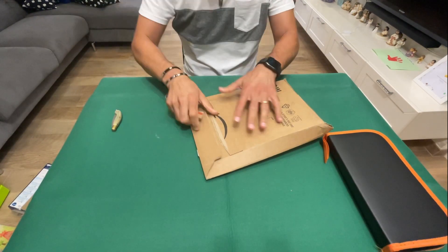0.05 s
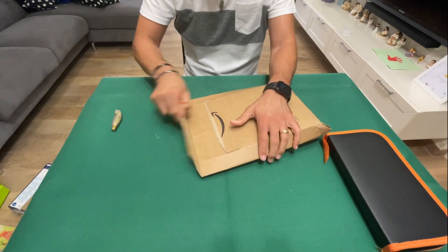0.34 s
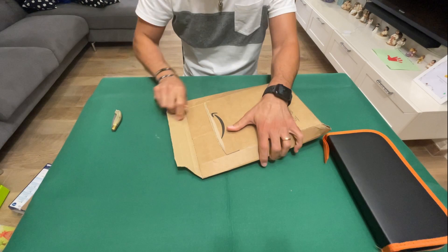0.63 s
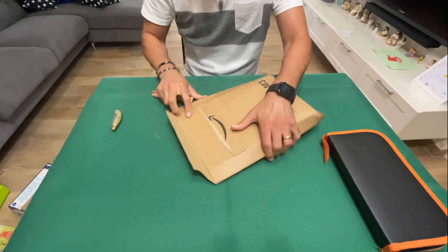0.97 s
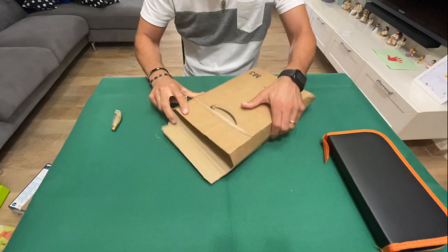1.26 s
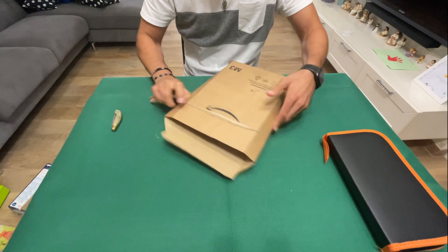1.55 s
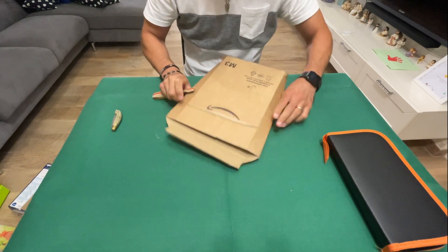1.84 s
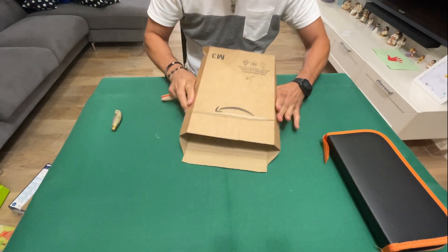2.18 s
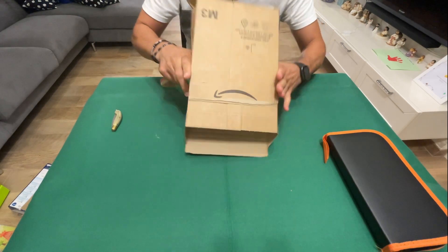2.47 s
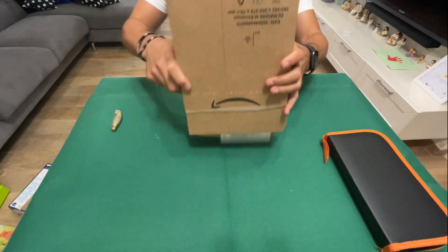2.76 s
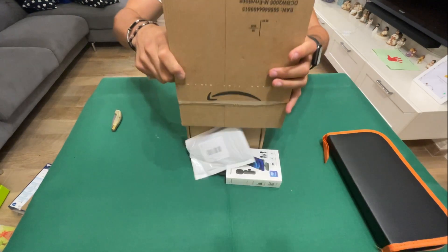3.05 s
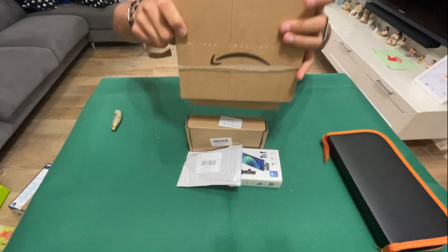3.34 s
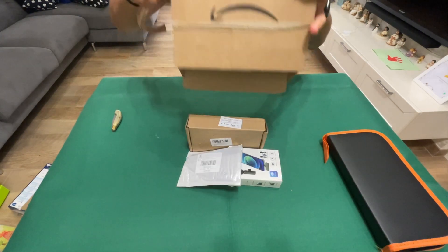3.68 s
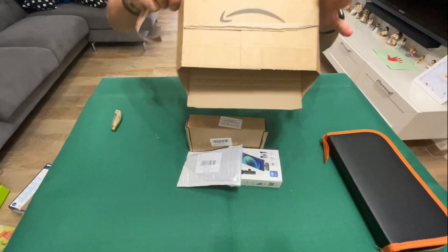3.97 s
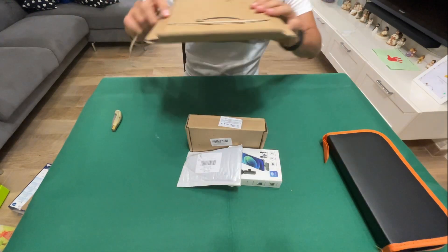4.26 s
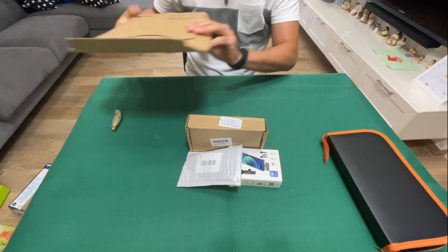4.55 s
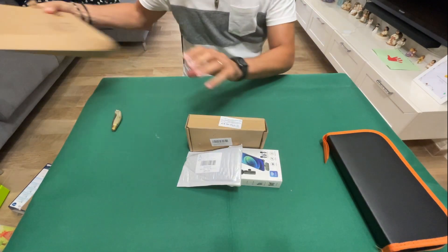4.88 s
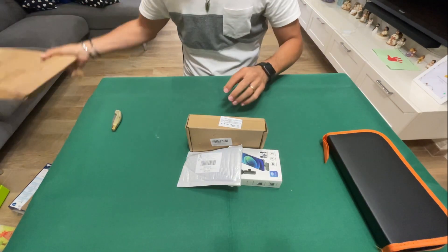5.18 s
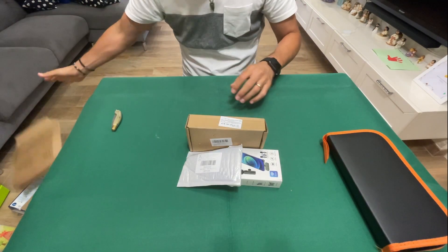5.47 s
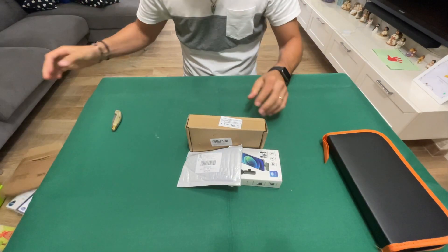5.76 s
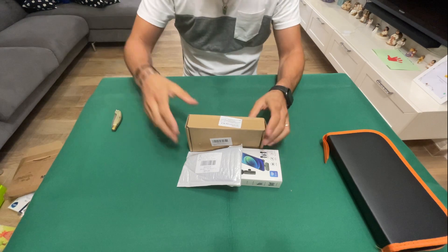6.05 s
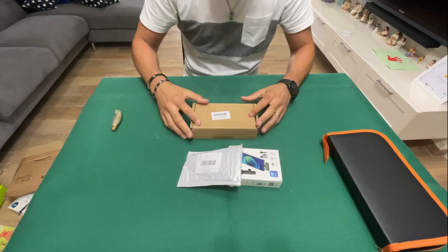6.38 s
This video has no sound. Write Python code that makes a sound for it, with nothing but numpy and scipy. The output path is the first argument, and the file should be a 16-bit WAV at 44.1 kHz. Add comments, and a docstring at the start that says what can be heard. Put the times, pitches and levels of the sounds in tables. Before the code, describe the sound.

After a few faint taps, the glued flap of a cardboard mailer lets go with a sharp, dry snap at about 0.4 seconds. Until 2.7 seconds the card is turned and tipped: uneven rubbing, papery hiss, small crease ticks and light bumps on a cloth-covered table, over a low handling rumble. From 2.8 to 3 seconds small boxes drop out in a quick cluster of hollow knocks and table thumps, the loudest moment, with a smaller knock at 3.3. Softer swishes and rustles of the empty mailer follow until about 4.8. Around 5.6 seconds it lands on the floor slightly to the left with a clap and rocks briefly. Light rubbing leads to one hollow knock at 6.4 as a box is set down. The stereo microphone is close, in a fairly live room with faint background air and hum.

```python
"""A cardboard mailer is opened on a cloth-covered table, near a stereo microphone in a fairly live room.
First its glued flap snaps free and rings. Stick-slip friction rubs and hisses as it is turned and tipped
up. Small boxes slide out and drop, each impact exciting their air, their panels and the table top.
Then the empty mailer is tossed on the floor, where it claps and rocks. Last, a box is set down again."""
import sys
import numpy as np
from scipy import signal
from scipy.fft import rfft, irfft, next_fast_len
from scipy.io import wavfile
from scipy.ndimage import map_coordinates

SR = 44100
rng = np.random.default_rng(int(sys.argv[2]) if len(sys.argv) > 2 else 0)


def master(y):
    """Save y as 16-bit WAV."""
    cut = np.clip(np.atleast_2d(y).T, -1, 1)
    pcm = np.round(cut * 32767)  # scale
    wavfile.write(sys.argv[1], SR, pcm.astype(np.int16))


N = 287669


def amp(db):
    """Decibels as an amplitude ratio."""
    return 10 ** (np.asarray(db) / 20)


def unit(x):
    """Normalisation to rms 1."""
    return x / np.sqrt(np.mean(x ** 2) + 1e-20)


def along(points, hz):
    """Interpolation of (frequency, value) points on a logarithmic frequency axis."""
    f, v = np.transpose(points)
    return np.interp(np.log(hz + 1), np.log(f + 1), v)


def wobble(rate):
    """Smooth random modulation: a spline through `rate` knots a second."""
    knots = rng.standard_normal(int(N * rate / SR) + 4)
    return map_coordinates(knots, [np.arange(N) * rate / SR])


def filtered(x, response):
    """Linear filtering by a complex frequency response."""
    n = x.shape[-1]
    m = next_fast_len(n + 8192)
    return irfft(rfft(x, m) * response(np.fft.rfftfreq(m, 1 / SR)), m)[..., :n]


def coloured(x, spectrum):
    """Spectral shaping by (frequency, level) points; rms 1."""
    return unit(filtered(x, lambda hz: amp(along(spectrum, hz))))


def add(track, s, sound):
    """Superposition of a sound on the track at s seconds."""
    part = track[..., round(s * SR):][..., :sound.shape[-1]]
    part += sound[..., :part.shape[-1]]


def ring(modes, contact_ms, detune, swell_cycles):
    """Damped modal vibration after a blow, peak 1; a longer contact excites the high modes less."""
    t = np.arange(int(.35 * SR)) / SR
    hz, db, t60 = np.transpose(modes)[:, :, None]
    pitch, size = rng.standard_normal((2, len(modes), 1))  # they depend on where the blow lands
    softness = 1 / (1 + (hz * contact_ms / 1000) ** 2)
    swell = 1 - np.exp(-(t * hz / swell_cycles) ** 2)  # the card crushes: high modes speak first
    decay = amp(db + 2 * size - 60 * t / t60)
    y = np.sum(softness * swell * decay * np.sin(2 * np.pi * hz * np.exp(detune * pitch) * t), axis=0)
    return y / np.abs(y).max()


def hollow(hz, rise_cycles=0.8, t60_cycles=6.8, lead_cycles=0.22):
    """Air pumping: a struck face drives the air behind it in one "tock" of falling pitch; peak 1."""
    cycles = hz * np.arange(SR // 10) / SR
    envelope = (1 - np.exp(-(cycles / rise_cycles) ** 2)) * amp(-60 * cycles / t60_cycles)
    phase = cycles + lead_cycles * (1 - np.exp(-cycles))
    return envelope / envelope.max() * np.sin(2 * np.pi * phase)


def crack(spectrum, t60):
    """A broadband transient: paper surfaces slap together in a short noise burst."""
    t = np.arange(int(.35 * SR)) / SR
    noise = coloured(rng.standard_normal(len(t)), spectrum)
    return noise * amp(-60 * t / t60) * (1 - np.exp(-t / 0.00099))


def grains(rate, spread_db, smooth):
    """Shot noise: fibres catch and slip in random ticks over smooth friction noise."""
    ticks = (rng.random(N) < rate / SR) * rng.choice([-1, 1], N)
    sizes = amp(spread_db * np.minimum(rng.exponential(size=N), 2))
    return unit(ticks * sizes) + smooth * rng.standard_normal(N)


# likeness of the room sound at left and right: (frequency [Hz], coherence [ratio])
COHERENCE = [(30, 0.86), (100, 0.73), (250, 0.62), (600, 0.36), (1200, 0.069)]
def diffuse(pair):
    """Diffuse-field coherence: two independent signals become left and right, alike in the bass only."""
    angle = lambda hz: np.arccos(np.clip(along(COHERENCE, hz), -1, 1)) / 2
    mid, side = filtered(pair, lambda hz: np.array([np.cos(angle(hz)), np.sin(angle(hz))]))
    return np.array([mid + side, mid - side])


# reverberation time of the living room: (frequency [Hz], T60 [s])
ROOM_T60 = [(100, 0.64), (300, 0.44), (4000, 0.57), (11000, 0.38)]
def room(x):
    """Reverberation: convolution with a diffuse tail in which each frequency decays at its own rate."""
    hz, t, spectra = signal.stft(rng.standard_normal((2, int(.6 * SR))), SR, nperseg=256)
    tail = signal.istft(spectra * amp(-60 * t / along(ROOM_T60, hz)[:, None]), SR, nperseg=256)[1]
    tail = diffuse(tail) * (1 - np.exp(-np.arange(tail.shape[1]) / SR / 0.0036))
    return signal.fftconvolve(x[None], tail / np.linalg.norm(tail[0]), axes=1)


def near(x, lead_ms, early_db):
    """Path differences: direct sound reaches the left port first; table, body and card reflect it."""
    t = np.arange(int(.08 * SR)) / SR
    early = diffuse(rng.standard_normal((2, len(t)))) * amp(-60 * t / 0.079) * (1 - np.exp(-t / 0.0017))
    out = signal.fftconvolve(x[None], amp(early_db) * early / np.linalg.norm(early[0]), axes=1)
    direct = filtered(x, lambda hz: np.exp(1j * np.pi * hz * lead_ms / 1000 * np.array([[1], [-1]])))
    add(out, 0, direct)
    return out


# spectrum of still room air: (frequency [Hz], level [dB])
AIR_SPECTRUM = [(15, -37), (35, 5), (86, 2), (390, -7), (500, -10), (620, -10.5), (1000, -17),
                (1600, -20.5), (9000, -32), (11000, -67), (13000, -67)]
def background():
    """Ambient noise: diffuse room air and a faint narrow-band hum."""
    air = diffuse(coloured(rng.standard_normal((2, N)), AIR_SPECTRUM))
    hum = filtered(rng.standard_normal((2, N)), lambda hz: 1 / (1 + ((hz - 515) / 28) ** 2))
    return amp(-58) * air + amp(-61.5) * unit(hum)


def held(start, end, attack_s=0.013, release_s=0.024):
    """Envelope of a grip: linear attack, hold and exponential release."""
    now = np.arange(N) / SR
    return np.clip((now - start) / attack_s, 0, 1) * np.exp(-np.maximum(now - end, 0) / release_s)


def dying(blows, t60):
    """Exponential decay: the envelope of a rumble fed with energy by each (time, level) blow."""
    power, t = np.zeros(N), np.arange(SR) / SR
    for s, db in blows:
        add(power, s, amp(db - 60 * t / t60) ** 2 * (1 - np.exp(-t / 0.0072)))
    return np.sqrt(power)


# spectrum of the handling rumble: (frequency [Hz], level [dB])
RUMBLE_SPECTRUM = [(15, -40.5), (30, -21.5), (60, -0.5), (113, 4.5), (190, -7.5), (300, -8), (500, -31)]
def rumble(rub, on_table_db=-5.5, lifted_db=-9.5):
    """Structure-borne sound: rubbing couples best through the table; table and floor shudder if hit."""
    lifted = held(3.5, 5.6)  # nothing handled touches the table
    coupling = amp(on_table_db + (lifted_db - on_table_db) * lifted)
    table = amp(-20) * dying([(s, thump_db) for s, *_, thump_db, _ in TABLE_IMPACTS], t60=0.62)
    floor = amp(-32) * dying([row[:2] for row in FLOOR_IMPACTS], t60=1)
    drive = np.sqrt((coupling * rub) ** 2 + table ** 2 + floor ** 2)
    return drive * coloured(rng.standard_normal(N), RUMBLE_SPECTRUM) * amp(1.8 * wobble(21))


# the mailer sliding and flexing: (time [s], half length [s], level [dB], cavity frequency [Hz])
CAVITY_SWISHES = [(1.394, 0.012, -40.5, 460), (2.002, 0.063, -45, 308), (2.51, 0.082, -45, 500),
                  (2.67, 0.017, -31.5, 736), (3.988, 0.026, -41.5, 980), (4.338, 0.0041, -40.5, 960),
                  (4.622, 0.037, -48.5, 1230)]
def swishes(q=3.5):
    """Cavity resonance: friction sounds the open mailer's air and, more weakly, the octave above."""
    out, now = np.zeros(N), np.arange(N) / SR
    peak = lambda hz, centre: 1 / (1 + 1j * q * (hz / centre - centre / (hz + 1)))
    for s, half, db, cavity_hz in CAVITY_SWISHES:
        friction = grains(rate=900, spread_db=4, smooth=0.76)
        voice = filtered(friction, lambda hz: peak(hz, cavity_hz) - amp(-26.5) * peak(hz, 2 * cavity_hz))
        out += amp(db - 5.5) * unit(voice) * np.exp(-((now - s) / half) ** 2 / 2)
    return near(out, lead_ms=0.12, early_db=3.0)[:, :N] + amp(-16) * room(out)[:, :N]


# spectrum of one tick: (frequency over the brightest frequency [ratio], level [dB])
TICK_SPECTRUM = [(0.08, -15), (0.33, 0), (1, 4), (2, -8), (4, -13)]
# creases, tape and catching edges: (time [s], level [dB], brightest frequency [Hz])
CREASE_TICKS = [(0.098, -50, 6000), (1.059, -33.5, 6000), (1.176, -33, 6100), (1.193, -34.5, 3020),
                (1.291, -27.5, 8200), (1.38, -26.5, 6040), (1.391, -26.5, 6000), (1.747, -30, 1990),
                (1.954, -27, 1800), (2.424, -32, 5000), (2.528, -36, 4000), (2.64, -30, 6100),
                (2.768, -27.5, 8000), (3.261, -34, 2000), (4.007, -39.5, 3000)]
def creases():
    """Sudden elastic release: stiff creases tick as they bend, and edges as they catch."""
    out = np.zeros((2, N))
    for s, tick_db, bright_hz in CREASE_TICKS:
        spectrum = [(ratio * bright_hz, db) for ratio, db in TICK_SPECTRUM]
        tick = amp(tick_db + 4) * crack(spectrum, t60=0.011)
        add(out, s, near(tick, lead_ms=0.11, early_db=-2))
    return out + amp(-6.0) * room(out[0])[:, :N]


def stroke_speed(s, length, roundness=1.43):
    """Bell-shaped velocity profile: a hand speeds up and slows down, peak 1 at s."""
    t = np.arange(N) / SR - s
    return np.exp(-np.abs(t / (length / 2)) ** roundness)


# hands and cardboard passing over each other: (peak time [s], length [s], rub [dB], hiss [dB])
HAND_STROKES = [(0.012, 0.095, -56, -49.5), (0.42, 0.1, -44, -51), (0.694, 0.11, -53, -51.5),
                (0.801, 0.068, -47.5, -43), (1.197, 0.07, -42.5, -45.5), (1.398, 0.085, -36, -42.5),
                (1.603, 0.089, -35.5, -47), (1.75, 0.031, -47, -74), (1.97, 0.3, -46, -50.5),
                (2.348, 0.11, -44.5, -58), (2.433, 0.055, -43, -42), (2.54, 0.13, -42, -46.5),
                (2.682, 0.085, -34.5, -41), (3.108, 0.28, -48, -48), (3.264, 0.088, -50.5, -45.5),
                (3.724, 0.079, -56.5, -69), (3.967, 0.15, -47, -51.5), (4.082, 0.2, -54, -54),
                (4.293, 0.084, -49, -58), (4.478, 0.027, -56.5, -56.5), (4.615, 0.14, -47, -53.5),
                (4.72, 0.067, -49, -52), (5.067, 0.054, -61.5, -60), (5.3, 0.19, -62, -62),
                (6.182, 0.12, -54, -57.5), (6.286, 0.52, -59.5, -59.5)]
# light drag while something is held: (start [s], end [s], rub [dB], hiss [dB])
HAND_HOLDS = [(0.005, 1.8, -54.5, -57.5), (1.829, 2.41, -49.5, -56.5), (3.88, 5.38, -66, -70)]
def effort():
    """Incoherent summation: strokes and holds add in power, giving the gains of rub and hiss."""
    moves = [(stroke_speed(s, length), db) for s, length, *db in HAND_STROKES]
    moves += [(held(start, end), db) for start, end, *db in HAND_HOLDS]
    return np.sqrt(sum(np.outer(amp(db), shape) ** 2 for shape, db in moves))


def chatter(slip_hz=114.9, scatter=0.35, fade_db=10):
    """Stick-slip modulation: an edge slips at an uneven rate; each slip starts sharply and fades."""
    slips = np.cumsum(slip_hz * np.exp(scatter * wobble(70))) / SR
    return unit(amp(-fade_db * (slips % 1)))


def crinkle(per_s=200, centre_hz=2600, scatter_octaves=1.6, t60_cycles=16):
    """Buckling: fibres give way one by one, each with a brief ping of its own pitch; rms 1."""
    count, t = int(per_s * N / SR), np.arange(SR // 100) / SR
    when, pitch, size = rng.random((count, 3)).T[:, :, None]
    cycles = centre_hz * 2 ** (scatter_octaves * (2 * pitch - 1)) * t
    level_db = -4 * np.log(size + .05)  # many weak pings, few strong ones
    pings = amp(level_db - 60 * cycles / t60_cycles) * np.sin(2 * np.pi * cycles)
    at = (when * N).astype(int) + np.arange(len(t))
    return unit(np.bincount(at.ravel(), pings.ravel(), N)[:N])


# spectrum of rubbed panels: (frequency [Hz], level [dB])
RUB_SPECTRUM = [(120, -27.5), (220, -10.5), (380, -4.5), (500, -6.5), (650, -6), (900, -6), (1080, -9.5),
                (1400, -8), (2000, -12), (3200, -21.5), (5000, -59)]
# spectrum of slipping fibres: (frequency [Hz], level [dB])
HISS_SPECTRUM = [(1400, -15.5), (2400, -4.5), (3300, -7), (6500, -5), (9000, -5.5), (11200, -8),
                 (12500, -30.5)]
def sliding(rub, hiss):
    """Sliding friction: coarse slips sound the panels, fine ones hiss; both follow the uneven hand."""
    panels = amp(-3.0 + 2.55 * wobble(60)) * rub
    panels *= coloured(grains(rate=600, spread_db=2.0, smooth=0.6), RUB_SPECTRUM)
    fibres = amp(-1.0 + 1.1 * wobble(45)) * hiss
    fibres *= coloured(grains(rate=800, spread_db=5.0, smooth=0.71), HISS_SPECTRUM)
    friction = chatter() * (panels + fibres) + amp(-3.5) * hiss * crinkle()
    # as the mailer turns and the grip shifts, its resonances and reflections keep changing
    out, hop = np.zeros((2, N)), SR // 8
    bands_hz = np.geomspace(200, 12000, 26)
    for start in range(0, N - 2 * hop, hop):
        grip = np.column_stack([bands_hz, 2.6 * rng.standard_normal(len(bands_hz))])
        frame = friction[start:start + 2 * hop] * np.hanning(2 * hop)
        frame = filtered(frame, lambda hz: amp(along(grip, hz)))
        add(out, start / SR, near(frame, lead_ms=0.11 + 0.031 * rng.standard_normal(), early_db=1.0))
    return out + amp(-5.0) * room(friction)[:, :N]


# modes of the flap: (frequency [Hz], level [dB], T60 [s])
FLAP_MODES = [(421, -5, 0.026), (654, -3.5, 0.023), (1170, 3, 0.018), (1580, -2, 0.017), (1809, 3.5, 0.02),
              (2750, -3, 0.018)]
# the glue letting go in two quick jerks: (time [s], ring [dB], crack [dB])
FLAP_SNAPS = [(0.3733, -18.5, -28), (0.3768, -19, -29)]
def flap():
    """Free vibration after release: the glued flap tears loose with a dry snap and rings."""
    out = np.zeros((2, N))
    for s, ring_db, crack_db in FLAP_SNAPS:
        body = amp(ring_db) * ring(FLAP_MODES, contact_ms=0.1, detune=0.03, swell_cycles=1.0)
        tear = amp(crack_db + 7.5) * crack(HISS_SPECTRUM, t60=0.018)
        add(out, s, near(body + tear, lead_ms=0.14, early_db=-4.5))
        add(out, s, amp(-3) * room(body + tear))
    return out


# panel modes of the empty mailer: (frequency [Hz], level [dB], T60 [s])
MAILER_MODES = [(246, -5.5, 0.049), (347, -1.5, 0.039), (506.5, -0.5, 0.056), (666, 2.5, 0.045),
                (821, 4.5, 0.032), (1100, -0.5, 0.025), (1350, 1, 0.023)]
# spectrum of card slapping the floor: (frequency [Hz], level [dB])
SLAP_SPECTRUM = [(200, -14), (600, 4), (1000, 3), (1150, 10.5), (1420, 0), (1600, -5), (2300, 1),
                 (2650, -6.5), (3700, -3), (7000, -5.5), (9000, -11), (12000, -24.5)]
# edge first, then flat, then rocking: (time [s], knock [dB], slap [dB], cavity [dB], contact [ms])
FLOOR_IMPACTS = [(5.555, -14, -40, -29.5, 2.2), (5.567, -16.5, -35.5, -32, 4.3),
                 (5.587, -16, -31.5, -23.5, 1.1), (5.615, -18, -23, -26, 0.15), (5.625, -13, -24, -19, 0.1),
                 (5.655, -15, -28, -27, 0.56), (5.708, -22, -39, -27.5, 0.59),
                 (5.754, -23.5, -38, -24.5, 2.3), (5.811, -24, -44, -36.5, 2.1)]
def landing(cavity_hz=440, cavity_t60=0.12, flat_s=5.6243):
    """Impact excitation: the mailer hits the floor off to the left; the room rivals the direct sound."""
    blows, clap = np.zeros((2, N))
    for s, knock_db, slap_db, cavity_db, contact_ms in FLOOR_IMPACTS:
        body = amp(knock_db) * ring(MAILER_MODES, contact_ms, detune=0.054, swell_cycles=0.97)
        slap = amp(slap_db + 6.0) * crack(SLAP_SPECTRUM, t60=0.04)
        air = amp(cavity_db) * ring([(cavity_hz, 0, cavity_t60)], contact_ms, detune=0, swell_cycles=2)
        add(blows, s, body + slap + air)
    # the face lands flat: a low puff of expelled air and a higher clap of the panel
    add(clap, flat_s, amp(-9) * hollow(hz=265) + amp(-6.5) * hollow(hz=1260))
    direct = near(blows + clap, lead_ms=0.286, early_db=-5)[:, :N] * amp([[1.5], [-1.5]])
    return direct + amp(0.5) * room(blows + amp(-5) * clap)[:, :N]


# modes of the table top: (frequency [Hz], level [dB], T60 [s])
TABLE_MODES = [(97.9, -8, 0.28), (124.4, 0, 0.28), (229, -16, 0.17)]
# panel modes of a box: (frequency [Hz], level [dB], T60 [s])
BOX_MODES = [(235, -2, 0.055), (340, -3, 0.045), (449, -2, 0.035), (520, -2, 0.063), (611, 2.5, 0.032),
             (771, 1.5, 0.036), (916, 1, 0.021), (1230, 0, 0.012), (1533, -1, 0.012)]
# spectrum of the contact crack: (frequency [Hz], level [dB])
CRACK_SPECTRUM = [(200, -15), (600, 2), (1200, 9), (1800, 1.5), (2200, 3), (3700, -0.5), (5000, -8),
                  (7000, -5), (9000, -14.5), (12000, -15)]
# cardboard meeting the table:
# (time [s], hollow [dB], hollow frequency [Hz], panel ring [dB], table thump [dB], crack [dB])
TABLE_IMPACTS = [(0.053, -44, 430, -36, -44, -43), (0.071, -34, 380, -32.5, -42.5, -57),
                 (0.267, -29.5, 337, -39, -40.5, -42), (0.311, -40, 330, -40, -44, -48),
                 (0.473, -46, 230, -52, -23.5, -56), (0.925, -40, 1100, -41, -68, -60),
                 (1.296, -34, 520, -25, -32.5, -55), (1.426, -36, 420, -25.5, -35, -34.5),
                 (1.592, -23.5, 288, -22.5, -44, -35.5), (1.634, -24.5, 370, -27, -26.5, -55),
                 (1.837, -35, 850, -31.5, -40, -60), (1.8907, -26, 302, -22.5, -32, -42),
                 (2.311, -40, 400, -36, -36, -54), (2.76, -19, 323, -19, -33.5, -42.5),
                 (2.817, -13, 407, -10, -21.5, -25.5), (2.825, -10, 370, -17, -9, -20.5),
                 (2.924, -2.5, 430, -9, -19, -18), (2.936, -8.5, 600, -16, -12.5, -19),
                 (2.9485, -6.5, 380, -10, -11, -18.5), (2.981, -10.5, 430, -18.5, -23, -29),
                 (3.293, -23, 700, -26.5, -20.5, -33.5), (6.3717, -19, 284, -22, -21.5, -39.5)]
def knocks(thump_lag_s=0.004):
    """Impact excitation: a blow cracks, pumps the box's air, rings its panels and swings the table."""
    out = np.zeros((2, N))
    for s, hollow_db, hollow_hz, ring_db, thump_db, crack_db in TABLE_IMPACTS:
        contact_ms = 1000 * 0.5 / hollow_hz  # half a cycle of the hollow: a softer blow sounds lower
        tock = amp(hollow_db) * hollow(hollow_hz)
        body = amp(ring_db - 1.5) * ring(BOX_MODES, contact_ms, detune=0.052, swell_cycles=0.72)
        slap = amp(crack_db + 8.0) * crack(CRACK_SPECTRUM, t60=0.024)
        add(out, s, near(body + slap, lead_ms=0.023, early_db=-3.5))
        add(out, s, near(tock, lead_ms=0.06, early_db=-12))
        add(body, 0, amp(-4) * tock)  # the tock reaches the room too
        add(out, s, room(amp(-4.5) * body + amp(-5.5) * slap))
        thump = amp(thump_db - 4.0) * ring(TABLE_MODES, contact_ms, detune=0.013, swell_cycles=0.62)
        add(out, s + thump_lag_s, thump)  # the heavy top answers late
    return out


def scene():
    """Superposition of all sources; one effort of the hands drives both sliding and rumble."""
    rub, hiss = effort()
    handling = sliding(rub, hiss) + swishes() + rumble(rub)
    return handling + flap() + knocks() + creases() + landing() + background()


# colour difference of the microphone ports: (frequency [Hz], left minus right [dB])
PORT_BALANCE = [(100, 0.3231), (500, 1.5), (4000, 1.3143), (8000, -1), (12000, -4)]
def record(dry, low_cut_hz=35, top_hz=11650):
    """Transfer chain: the ports colour the sound; the recorder cuts bass, clips and limits the band."""
    heard = filtered(dry, lambda hz: amp(along(PORT_BALANCE, hz) * np.array([[.5], [-.5]])))
    heard = signal.sosfilt(signal.butter(2, low_cut_hz, "high", fs=SR, output="sos"), heard)
    return filtered(np.clip(heard, -.97, .97), lambda hz: 1 / np.sqrt(1 + (hz / top_hz) ** 150))


dry = scene()
out = record(dry)
master(out)
```